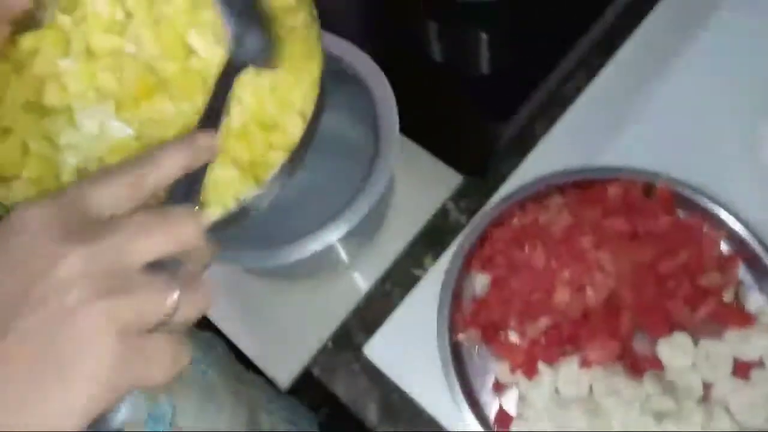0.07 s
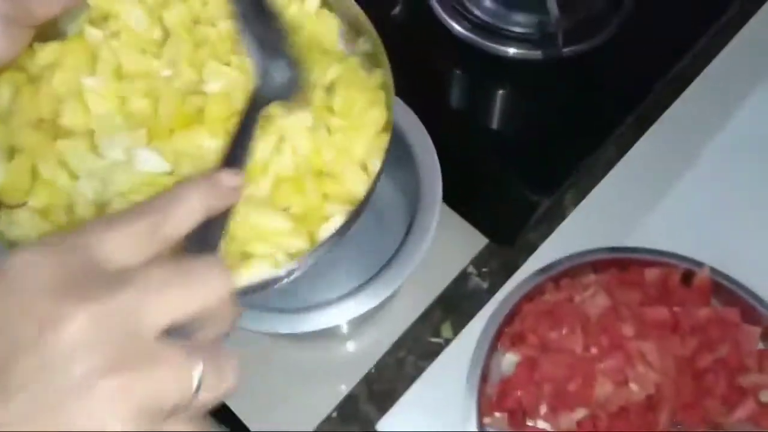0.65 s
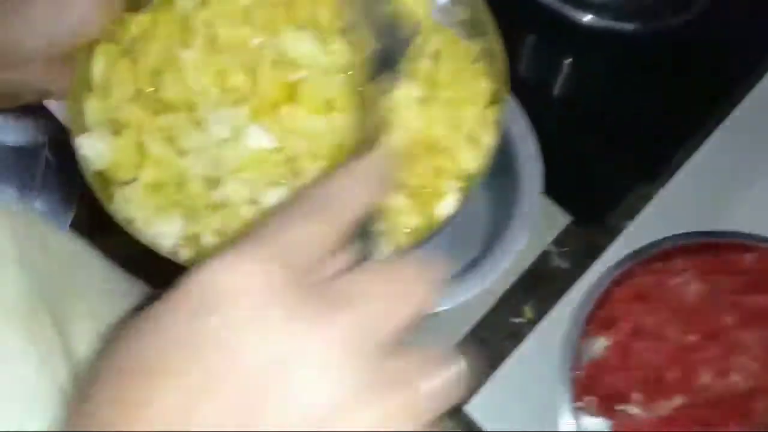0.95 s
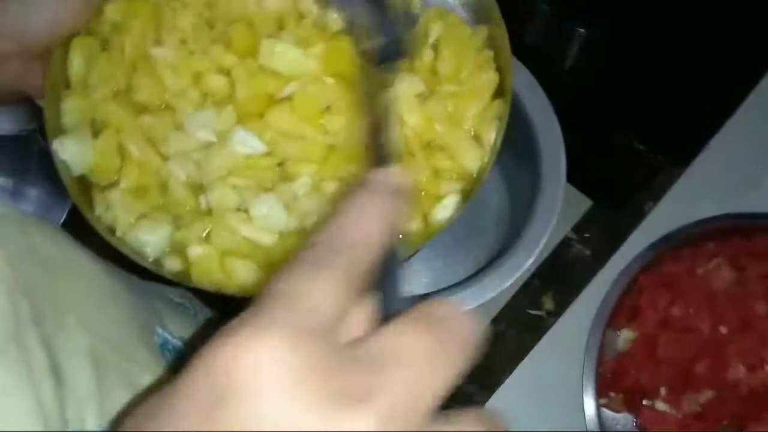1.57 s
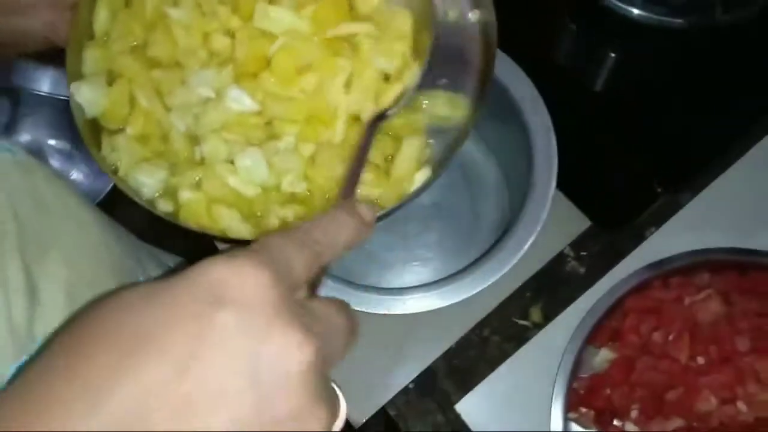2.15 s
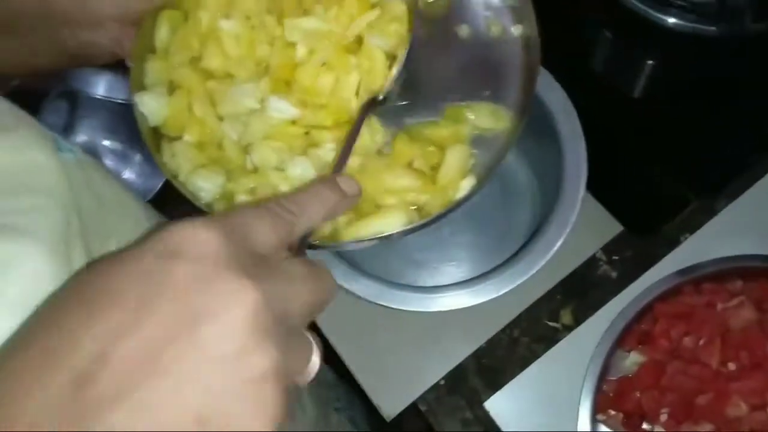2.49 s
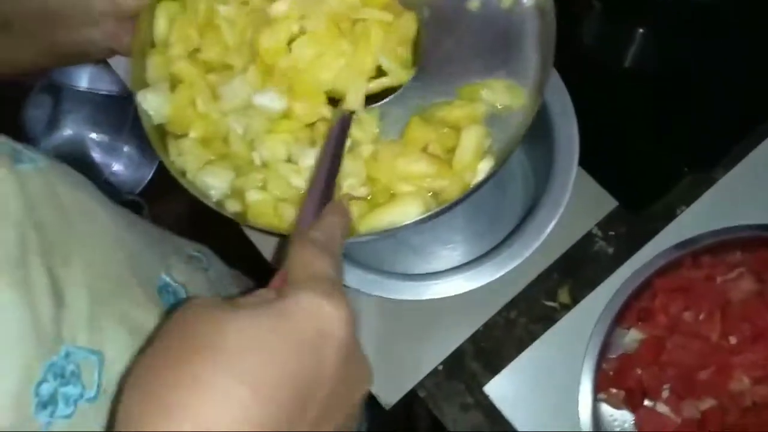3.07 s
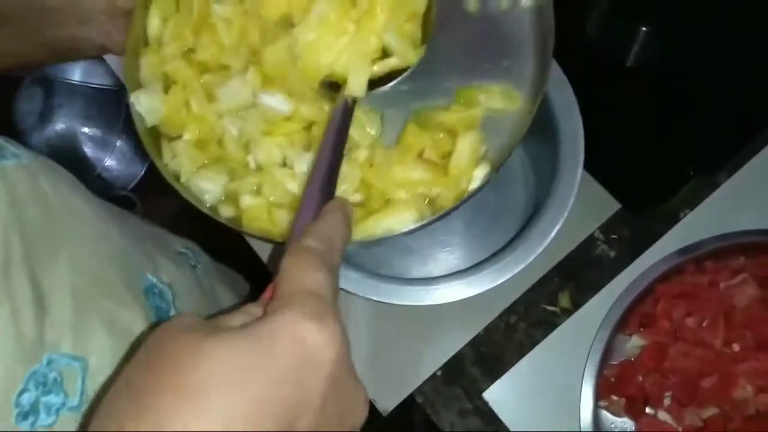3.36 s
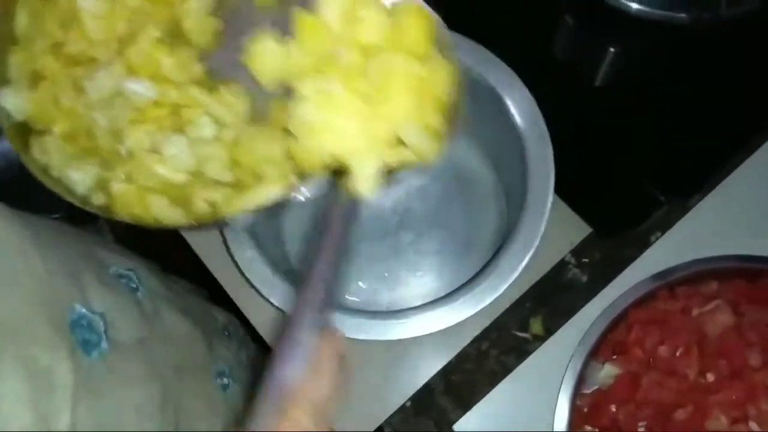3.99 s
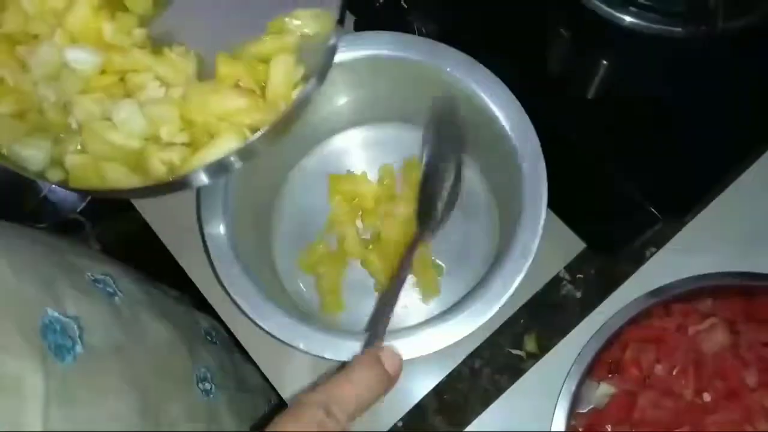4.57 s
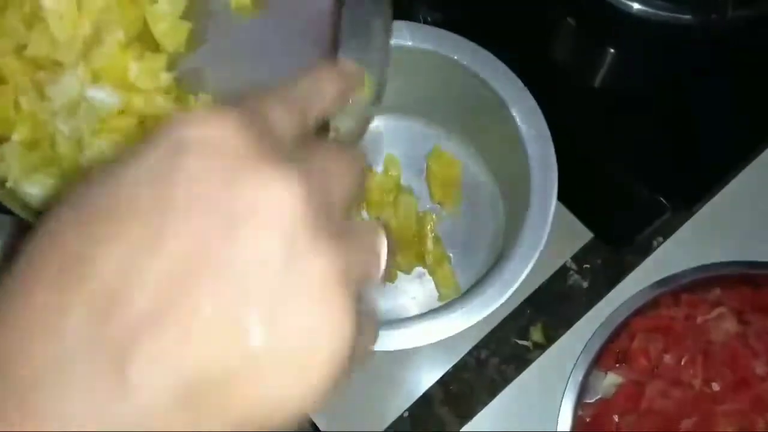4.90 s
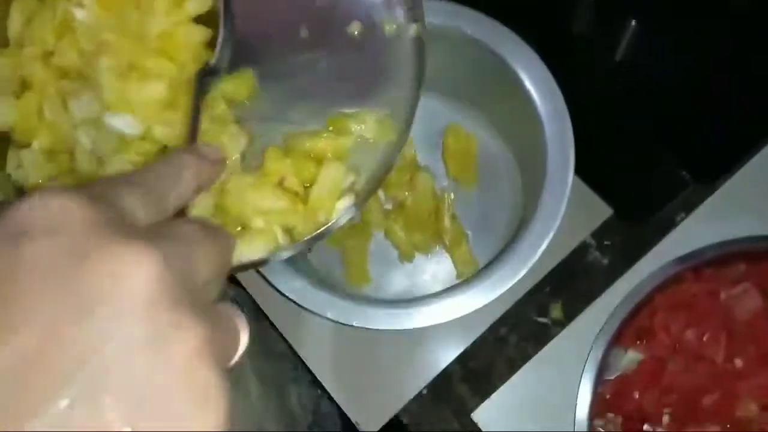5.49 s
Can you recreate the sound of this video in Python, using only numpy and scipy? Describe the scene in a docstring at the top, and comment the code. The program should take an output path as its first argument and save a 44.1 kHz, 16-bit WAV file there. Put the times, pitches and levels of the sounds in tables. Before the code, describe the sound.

Against the soft, steady fan-like rush of a small kitchen, a metal spatula makes sparse, close clinks and short scrapes on a steel plate, muffled by chopped fruit that barely rustles. A spoonful lands in a bowl with a dull little thud. Then the spatula strikes the bared steel twice and drags across it in one bright scrape dotted with clinks, the loudest passage.

```python
"""In a small kitchen, a metal spatula pushes chopped fruit across a hand-held steel plate.
Stick-slip friction in short strokes and sharp clinks excite the modes of plate and blade. One load
drops into a bowl with a damped thud; then the spatula lands again and makes a long scrape.
The fruit rustles faintly, and a fan-like rush, mains hum and a faint climbing hum fill the room."""
import sys
import numpy as np
from scipy import signal
from scipy.fft import rfft, irfft, next_fast_len
from scipy.io import wavfile

SR = 44100
rng = np.random.default_rng(int(sys.argv[2]) if len(sys.argv) > 2 else 0)


def unload_wav(signal):
    """Save mono or channel-first audio to the path in sys.argv[1] as 16-bit WAV at rate SR, clipped to [-1, 1]."""
    wavfile.write(
        sys.argv[1],
        SR,
        np.round(np.clip(np.atleast_2d(signal).T, -1, 1) * 32767).astype(np.int16),
    )


N = 244314
TIME = np.arange(N) / SR
FFT_SIZE = 2 * next_fast_len((N + SR // 4) // 2)
BARE_FROM_S = 4.9  # fruit muffles the steel until the spatula comes back to the bared rim

# Strokes of the edge on steel. Each row: start in seconds, length in seconds, crest level in dB, swell
# to the crest in dB, place of the crest from 0 to 1, treble in dB, body in dB, blade ring in dB.
EDGE_STROKES = [(0.001, 0.051, -48, 8.5, 0, -5, 11.5, -22), (1.899, 0.081, -43, 1, 0.5, 8.5, 5.5, -29),
                (2.086, 0.038, -33.5, 9, 0.52, -13, -0.5, -13.5),
                (2.765, 0.05, -39.5, 9.5, 0.47, -31, 3, -25), (2.856, 0.043, -52.5, 4, 0, -40, 13, -11.5),
                (4.43, 0.053, -45, 5, 0.19, 3, 10.5, -12), (4.977, 0.063, -30.5, 9.5, 0.67, 7.5, 6.5, -7.5),
                (5.037, 0.057, -30, 12, 0.12, 7.5, 6, -17), (5.14, 0.045, -41, 1.5, 0.6, -5, 5, -6),
                (5.185, 0.22, -24, 12, 0.54, 3.5, -3, -28),
                (5.311, 0.034, -27.5, 5.5, 0.48, -14, -10, -7.5)]
# Clinks of the spatula. Each row: start in seconds, relative level in dB, ring pitch in Hz,
# ring against click in dB, ring t60 in seconds, high-pass edge in Hz.
SPATULA_CLINKS = [(0.002, -40, 4590, 13, 0.047, 800), (1.224, -49, 7630, 16, 0.025, 2000),
                  (1.8995, -9.5, 4430, -5.5, 0.019, 8000), (1.907, -37, 6960, 4, 0.01, 4000),
                  (1.937, -39, 6850, 12, 0.015, 3000), (1.972, -35, 6900, 7, 0.01, 4000),
                  (2.097, -27, 4170, 2.5, 0.0086, 2000), (2.105, -25, 6820, -2.5, 0.012, 2000),
                  (2.518, -58, 6800, 7, 0.03, 3000), (2.865, -33.5, 5400, 6.5, 0.0072, 1000),
                  (3.605, -48, 5800, -5, 0.01, 3000), (4.414, -32, 4900, -4, 0.036, 2000),
                  (4.434, -40, 4770, 6, 0.04, 1500), (4.452, -24, 7420, 1, 0.011, 2500),
                  (4.9765, -14.5, 2610, 5, 0.0068, 2980), (5.037, -2.5, 5650, -17, 0.01, 2200),
                  (5.188, -23, 6900, -17, 0.01, 2000), (5.213, -17, 5440, -11, 0.01, 3000),
                  (5.271, -15.5, 4290, 3, 0.02, 3000), (5.289, -18, 7320, 5.5, 0.014, 3000),
                  (5.318, -17.5, 6850, 6, 0.012, 3000), (5.404, -29, 7400, -32, 0.01, 2000)]
# Modes of the loaded plate. Each row: frequency in Hz, relative level in dB, t60 in seconds.
PLATE_RESONANCES = [(2465, 4, .11), (3031, 4, .08), (3348, -1, .07), (4140, -6, .1), (4214, 1, .14),
                    (4700, -4, .07), (4937, 0, .14), (5075, -.5, .14), (5308, -4, .1), (5609, -5, .1),
                    (6045, -2, .14), (6550, -5, .1), (6847, -3, .15), (6912, -2, .15), (7095, -2.5, .14),
                    (7179, -3, .14), (7317, -5, .13), (7383, -4, .13), (7508, -3, .16), (7620, -4, .14),
                    (8849, -2, .12), (14000, -7, .04)]
# Modes of the spatula's blade. Each row: frequency in Hz, relative level in dB, t60 in seconds.
BLADE_RESONANCES = [(2490, 6, 0.04), (3030, 0, 0.04), (3330, 1, 0.03), (5100, -3, 0.015), (7200, -2, 0.02)]
# Tone colour of the scrapes and clinks, with the treble cut sharply above 8 kHz.
# Each row: frequency in Hz, relative level in dB.
CONTACT_COLOUR = [(60, -22.5), (170, -5), (380, 4), (600, -2), (1200, -8), (2100, -8), (2480, -14),
                  (2800, -16), (3030, -10.5), (3350, -11), (3900, -3), (4180, -1), (5200, -1.5), (6200, -3),
                  (6900, -1.5), (7600, 0.5), (8050, -10.5), (10500, -13.5), (12500, -19.5), (15500, -23)]
# Uneven radiation of the plate to the two sides. Each row: frequency in Hz, left minus right in dB.
PLATE_DIRECTIVITY = [(100, 3.5), (300, -5), (700, -2), (1300, 0), (2450, 1.5), (3300, 4.5), (4300, -4.5),
                     (5800, -4), (7000, -1.5), (9000, 1)]
# Direction of the treble as the spatula travels, in the early and the late strokes.
# Each row: time in seconds, left minus right in dB.
EARLY_PAN = [(1.89, -1), (2.058, 3), (2.07, -18), (2.14, 5)]
LATE_PAN = [(4.98, 3.5), (5.058, 2.5), (5.106, -7), (5.198, -13.5), (5.28, -5), (5.338, -3.5), (5.374, -16),
            (5.406, -7), (5.45, 0)]
# Dull blows of fruit landing in the bowl and the spatula bumping the plate.
# Each row: start in seconds, level in dB, pitch in Hz, t60 in seconds.
DULL_BLOWS = [(0.010, -37, 290, 0.02), (4.453, -39.5, 180, 0.05), (4.457, -36, 278, 0.15),
              (5.0355, -7.5, 730, 0.0044), (5.04, -30.5, 307, 0.048)]
# Pieces of fruit shifting. Each row: centre in seconds, half width in seconds, level in dB.
FRUIT_SHIFTS = [(0.52, 0.037, -69.5), (1.54, 0.057, -67.5), (3.8, 0.24, -76), (4.78, 0.24, -71)]
# Tone colour of the rustle. Each row: frequency in Hz, relative level in dB.
RUSTLE_SPECTRUM = [(500, -10), (3000, -6), (4500, 3), (7600, 1), (8500, -9), (12000, -18), (15000, -31)]
# Tone colour of the steady rush. Each row: frequency in Hz, relative level in dB.
RUSH_SPECTRUM = [(25, -40), (70, -30.5), (120, -12), (190, -11), (290, 0.5), (345, -5), (415, 2.5),
                 (468, 0.5), (530, -7.5), (900, -6), (2000, -14.5), (2800, -19), (3300, -17), (7850, -27.5),
                 (8300, -41), (12000, -45.5), (14000, -64)]
# Swells of the climbing hum. Each row: centre in seconds, half width in seconds, level in dB.
CLIMBING_SWELLS = [(3.5, 0.098, -62.5), (3.86, 0.14, -64), (4.2, 0.078, -70)]
# Likeness of the sound at the two microphones. Each row: frequency in Hz, coherence from 0 to 1.
MIC_COHERENCE = [(60, .88), (450, .92), (1200, .62), (2800, .55), (3420, .95), (3720, .95), (4150, .15),
                 (7000, .05), (15000, .05)]


def scraping(slips_per_s=900, spread_db=3, hiss=0.78, treble_hz=9000, body_hz=1800, dulling_db=10):
    """Stick-slip friction: the force is a train of tiny uneven slips over hiss, swelling each stroke."""
    force = np.zeros(N)
    for start, length, level_db, swell_db, crest, treble_db, body_db, _ in EDGE_STROKES:
        place = np.linspace(0, 1, int(length * SR))
        slips = impulses(SR, slips_per_s, spread_db)[:len(place)]
        friction = rng.standard_normal(SR)[:len(place)]
        grain = unit_energy(unit_energy(slips) + hiss * unit_energy(friction))
        off_crest = np.interp(place, [0, np.clip(crest, .02, .98), 1], [1, 0, 1])
        stroke = grain * np.sqrt(len(place)) * from_db(level_db - swell_db * off_crest)
        # a sharp edge adds treble, a flat blade moves the whole plate
        treble = from_db(treble_db - dulling_db * (place - .5))
        stroke += (treble - 1) * passed(stroke, treble_hz, "high")
        stroke += (from_db(body_db) - 1) * passed(stroke, body_hz, "low")
        at = int(start * SR)
        force[at:at + len(stroke)] += stroke[:N - at]
    return force * from_db(0.4 * drift(per_s=33))  # the pressure of the hand trembles


def clinking(gain_db=7.5):
    """Hard impact: a click and the blade's brief ring; the finer the contact, the less bass."""
    force, t = np.zeros(N), TIME[:SR // 10]
    for start, level_db, pitch_hz, ring_db, t60, edge_hz in SPATULA_CLINKS:
        blow = from_db(ring_db) * unit_energy(np.sin(2 * np.pi * pitch_hz * t) * dying(t, t60))
        blow[0] += 1
        at = int(start * SR)
        force[at:at + len(t)] += from_db(level_db + gain_db) * passed(blow, edge_hz, "high")
    return force


def plate_wash(force, crack_db=5, wash_db=1, covered_t60=0.092, bare_t60=0.115, spots_per_s=45, spots=5):
    """Modal overlap: a contact gives a push, a crack and a wash of close modes, shortened by fruit."""
    t = TIME[:SR // 8]
    push = np.array([t == 0, 0 * t])
    bare = TIME >= BARE_FROM_S
    # as the edge travels, each spot of the plate answers with another mix of modes
    spot = (TIME * spots_per_s).astype(int) % spots
    sound = np.zeros((2, N))
    for k in range(spots):
        crack = from_db(crack_db) * unit_energy(rng.standard_normal((2, len(t))) * dying(t, t60=0.016))
        close_modes = rng.standard_normal((2, len(t)))
        for when, t60 in ((~bare, covered_t60), (bare, bare_t60)):
            wash = from_db(wash_db) * unit_energy(close_modes * dying(t, t60))
            # in the bass the plate moves as one piece; its modes crowd together only higher up
            contact = push + passed(crack + wash, edge_hz=1300, kind="high")
            sound += convolve(force * when * (spot == k), contact / np.linalg.norm(contact[0]))
    return sound


def plate_ring(force, covered_db=-30, bare_db=-9):
    """Resonance: the force excites the plate's clear modes, weakly while fruit covers the steel."""
    coupling = from_db(np.where(TIME < BARE_FROM_S, covered_db, bare_db))
    return wavering(convolve(force * coupling, ringing(PLATE_RESONANCES)), share=.001)


def blade_ring(force):
    """Forced vibration: the blade's modes are driven for the length of each stroke."""
    coupling = sum(from_db(ring_db) * (TIME >= start) * (TIME < start + length)
                   for start, length, *_, ring_db in EDGE_STROKES)
    return wavering(convolve(force * coupling, ringing(BLADE_RESONANCES)), share=.012)


def ringing(modes):
    """Superposition of damped modes; two rows in quadrature give both sides equal strength."""
    t, quadrature = TIME[:SR // 3], np.array([[0], [np.pi / 2]])
    response = 0
    for hz, db, t60 in modes:
        phase = 2 * np.pi * (hz * t + rng.random()) + quadrature
        response += from_db(db) * unit_energy(np.sin(phase) * dying(t, t60))
    return unit_energy(response)


def wavering(x, share, bends_per_s=45):
    """Frequency modulation: changing pressure bends every pitch by a small share."""
    warped_time = TIME + share / bends_per_s * drift(bends_per_s)
    fine_time = np.arange(4 * N) / (4 * SR)
    oversampled = signal.resample_poly(x, 4, 1, axis=-1)
    return np.array([np.interp(warped_time, fine_time, row) for row in oversampled])


def plate_shadow(stereo, shade_hz=3900):
    """Acoustic shadow: the plate shades only short waves, so the treble moves with the spatula."""
    pan_db = np.interp(TIME, *np.vstack([EARLY_PAN, LATE_PAN]).T)
    treble = signal.sosfiltfilt(signal.butter(4, shade_hz, "high", fs=SR, output="sos"), stereo)
    sides = from_db(np.array([pan_db, -pan_db]) / 2)
    sides /= np.sqrt(np.mean(sides ** 2, axis=0))
    return stereo + treble * (sides - 1)


def thuds(baffle_hz=170):
    """Damped oscillation: a soft, heavy blow excites one low mode; a small dish radiates little bass."""
    low = sum(from_db(db) * np.sin(2 * np.pi * hz * (start - TIME)) * dying(TIME - start, t60)
              for start, db, hz, t60 in DULL_BLOWS)
    radiated = signal.sosfilt(signal.butter(2, baffle_hz, "high", fs=SR, output="sos"), low)
    return np.array([radiated, np.zeros(N)])


def fruit_rustle():
    """Shot noise: wet pieces slide over each other, and their tiny ticks merge into a rustle."""
    ticks = np.sqrt(N) * unit_energy(impulses((2, N), per_s=1500, spread_db=4))
    return microphones(colour(ticks * swells(FRUIT_SHIFTS), RUSTLE_SPECTRUM))


def kitchen(pair, t60=0.52, covered_wet_db=-18.5, bare_wet_db=-16.5, wall_hz=3500, first_echo_s=0.0059):
    """Reverberation: near, hard walls add a short, duller tail, weaker while fruit covers the steel."""
    t = TIME[:SR // 2]
    tail = passed(rng.standard_normal((2, len(t))) * dying(t - first_echo_s, t60), wall_hz, "low")
    wet = from_db(np.where(TIME < BARE_FROM_S, covered_wet_db, bare_wet_db))
    return pair + convolve(wet * pair[0], unit_energy(tail))


def room_rush(level_db=-54):
    """Broadband noise: a steady, fan-like rush, strongest at a few hundred hertz."""
    return microphones(from_db(level_db) * colour(rng.standard_normal((2, N)), RUSH_SPECTRUM))


def mains_hum(hz=102, level_db=-80, waver_db=3, swell_db=8.5, swell_at_s=2.98, half_width_s=0.26):
    """Amplitude modulation: the mains hum wavers in level and swells once."""
    swell = np.exp(-((TIME - swell_at_s) / half_width_s) ** 2)
    rms = from_db(level_db + swell_db * swell + waver_db * drift(per_s=3.7))
    return np.sqrt(2) * rms * np.sin(2 * np.pi * hz * TIME)


def climbing_hum(hz=187, reached_at_s=3.1, rise_hz_per_s=46, waver_hz=6.1, waver_db=5):
    """Masking: a faint, rising tone surfaces from the rush only in short swells."""
    pitch_hz = hz + rise_hz_per_s * (TIME - reached_at_s) + waver_hz * drift(per_s=30.08)
    rms = swells(CLIMBING_SWELLS) * from_db(waver_db * drift(per_s=17))
    return np.sqrt(2) * rms * np.sin(2 * np.pi * np.cumsum(pitch_hz) / SR)


def microphones(pair, directivity=None, left_lag_samples=6.2):
    """Partial coherence: a shared and a differing row mix into left and right, the left a bit later."""
    hz = np.fft.rfftfreq(FFT_SIZE, 1 / SR)
    coherence = np.clip(at_hz(MIC_COHERENCE, hz), 0, 1)
    shared, differing = rfft(pair, FFT_SIZE)
    shared *= np.sqrt((1 + coherence) / 2)
    differing *= np.sqrt((1 - coherence) / 2)
    delay = np.exp(-2j * np.pi * hz * left_lag_samples / SR)
    lean = 1 if directivity is None else from_db(at_hz(directivity, hz) / 2)
    return irfft([(shared + differing) * delay * lean, (shared - differing) / lean])[:, :N]


def impulses(shape, per_s, spread_db):
    """Poisson process: independent impulses of uneven size and either sign."""
    sizes = from_db(spread_db * np.minimum(rng.exponential(1, shape), 3))
    signs = rng.choice([-1, 1], shape)
    return sizes * signs * (rng.random(shape) < per_s / SR)


def swells(table):
    """Gaussian envelopes, one for each row, summed."""
    return sum(from_db(db) * np.exp(-((TIME - centre) / width) ** 2) for centre, width, db in table)


def drift(per_s):
    """Slow random fluctuation with a spread of about one."""
    knots = rng.standard_normal(N // 40)
    return np.interp(TIME * per_s, np.arange(len(knots)), knots)


def dying(t, t60):
    """Exponential decay by 60 dB in t60 seconds, silent before time zero."""
    return from_db(-60 * np.clip(t / t60, 0, 5)) * (t >= 0)


def colour(x, spectrum):
    """Minimum-phase filter that keeps the power of white noise."""
    gain = from_db(at_hz(spectrum, np.fft.rfftfreq(FFT_SIZE, 1 / SR)))
    cepstrum = irfft(np.log(gain / np.sqrt(np.mean(gain ** 2))))
    # folding onto positive time makes the filter causal
    cepstrum[1:FFT_SIZE // 2] *= 2
    cepstrum[FFT_SIZE // 2 + 1:] = 0
    return irfft(rfft(x, FFT_SIZE) * np.exp(rfft(cepstrum)))[..., :N]


def passed(x, edge_hz, kind):
    """First-order low-pass or high-pass."""
    return signal.sosfilt(signal.butter(1, edge_hz, kind, fs=SR, output="sos"), x)


def convolve(x, response):
    """Convolution with one impulse response per row."""
    return signal.oaconvolve(np.atleast_2d(x), response, axes=-1)[:, :N]


def at_hz(points, hz):
    """Interpolation along a logarithmic frequency axis."""
    knots_hz, values = np.transpose(points)
    return np.interp(np.log(hz + 1), np.log(knots_hz), values)


def unit_energy(x):
    """Normalisation of each row to an energy of one."""
    return x / np.sqrt(np.sum(x ** 2, axis=-1, keepdims=True) + 1e-20)


def from_db(db):
    """Decibels to amplitude ratio."""
    return 10 ** (np.asarray(db) / 20)


def scene():
    """Source and resonator: one contact force drives plate and blade; fruit and room sounds add on."""
    force = scraping() + clinking()
    scrapes_and_clinks = colour(plate_wash(force) + plate_ring(force) + blade_ring(force), CONTACT_COLOUR)
    contacts = microphones(kitchen(scrapes_and_clinks + thuds()), PLATE_DIRECTIVITY)
    return plate_shadow(contacts) + fruit_rustle() + room_rush() + mains_hum() + climbing_hum()


def record(dry):
    """Antiphase: one narrow band keeps only the channels' difference; the top is cut steeply."""
    opposed_hz, cutoff_hz = (3410, 3820), 15500
    mid = dry.mean(axis=0)
    notched_mid = signal.sosfiltfilt(signal.butter(3, opposed_hz, "bandstop", fs=SR, output="sos"), mid)
    low_pass = signal.ellip(10, .1, 80, cutoff_hz, fs=SR, output="sos")
    return signal.sosfilt(low_pass, dry - mid + notched_mid)


dry = scene()
out = record(dry)
unload_wav(out)
```